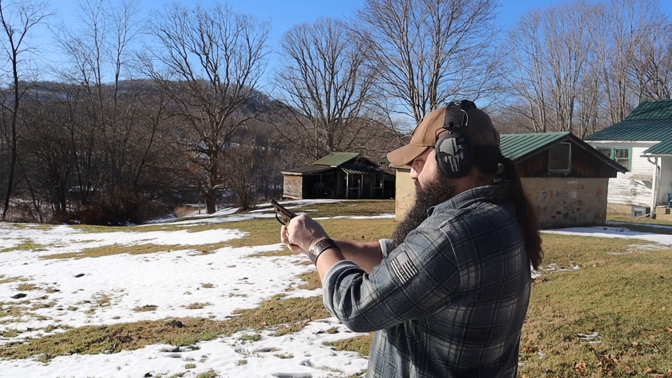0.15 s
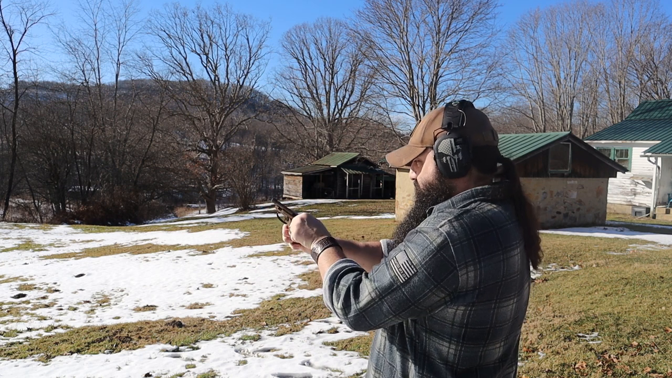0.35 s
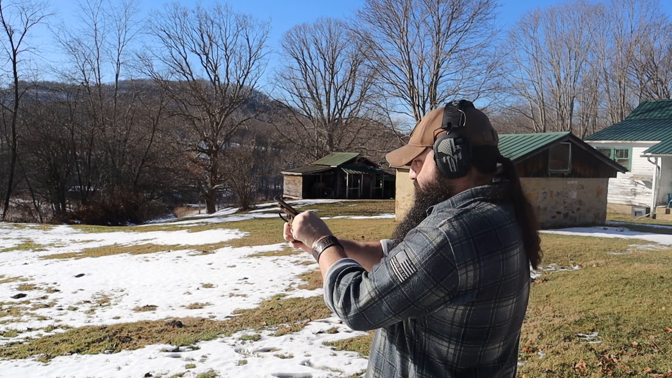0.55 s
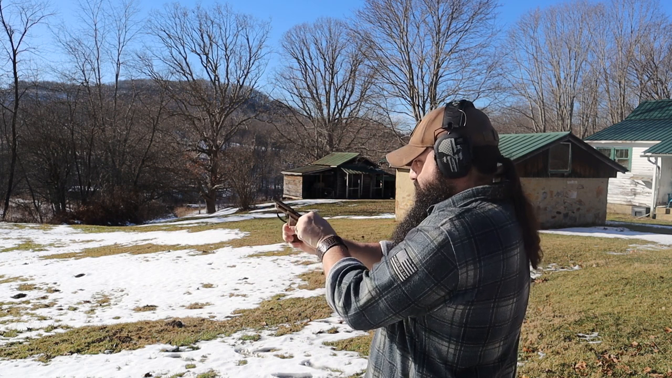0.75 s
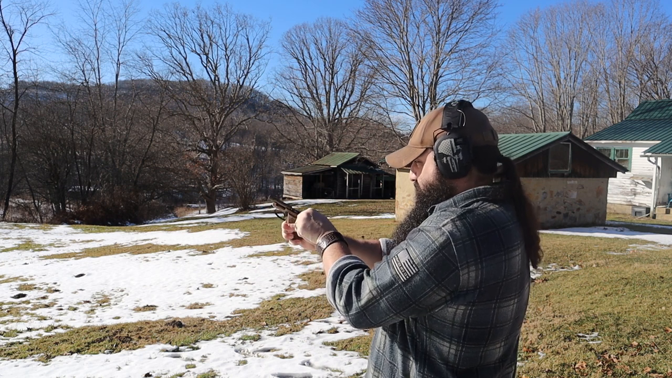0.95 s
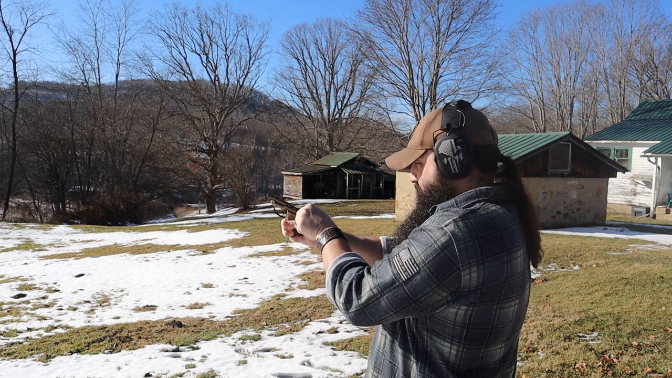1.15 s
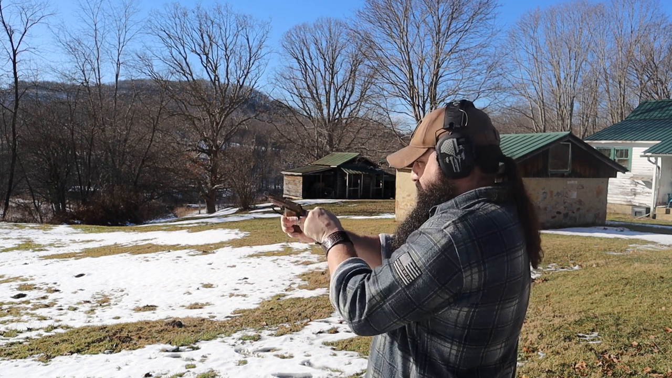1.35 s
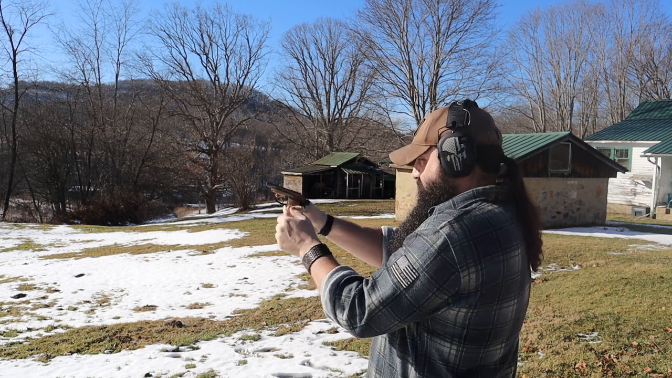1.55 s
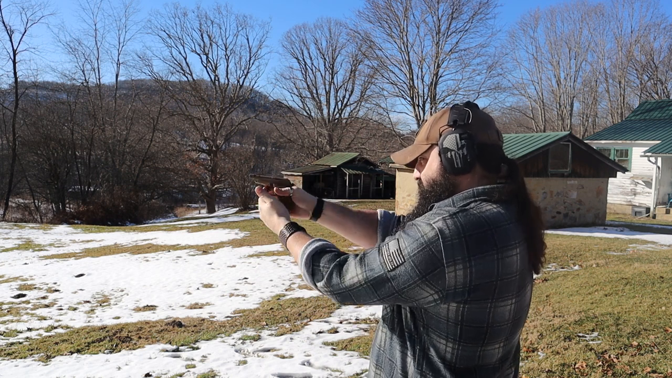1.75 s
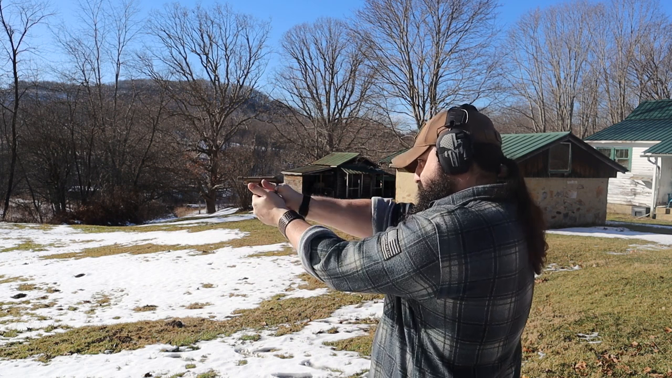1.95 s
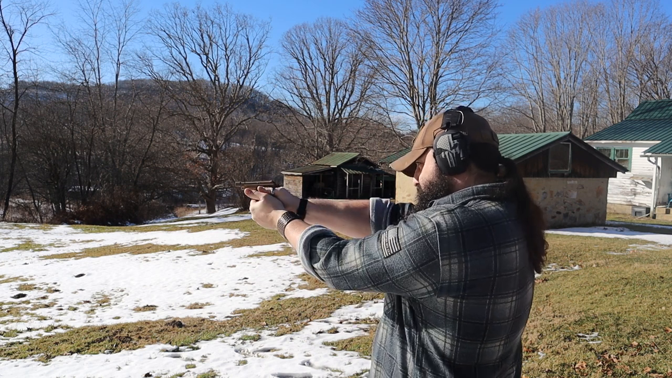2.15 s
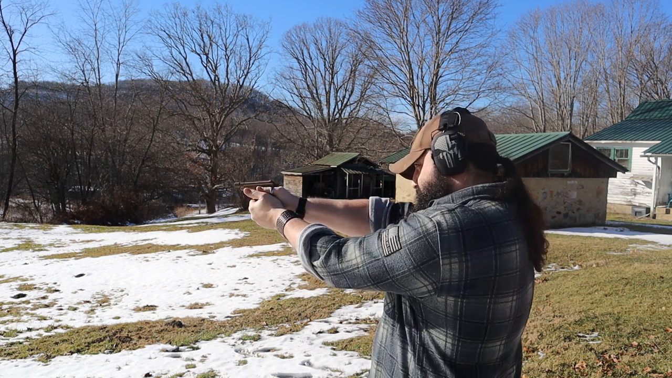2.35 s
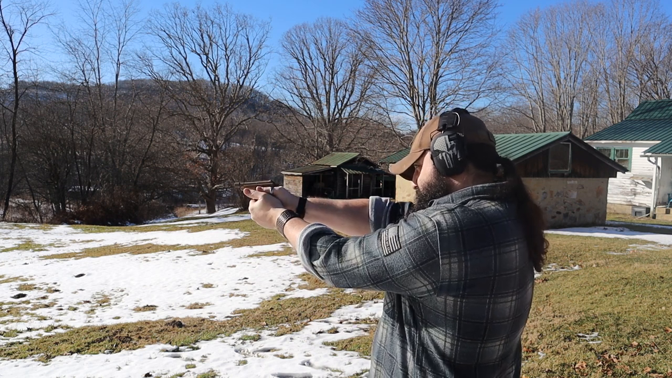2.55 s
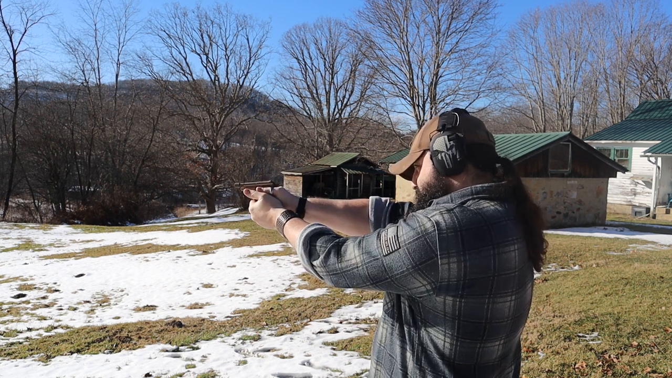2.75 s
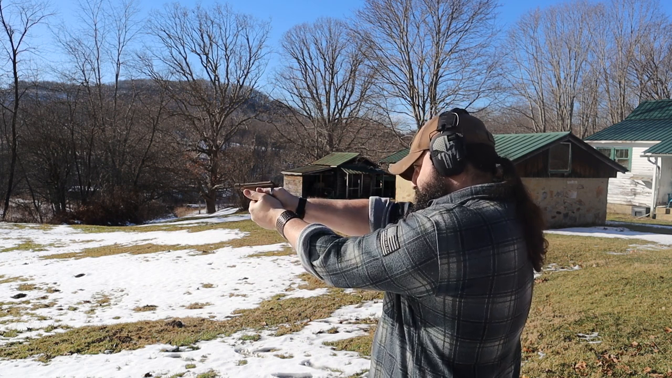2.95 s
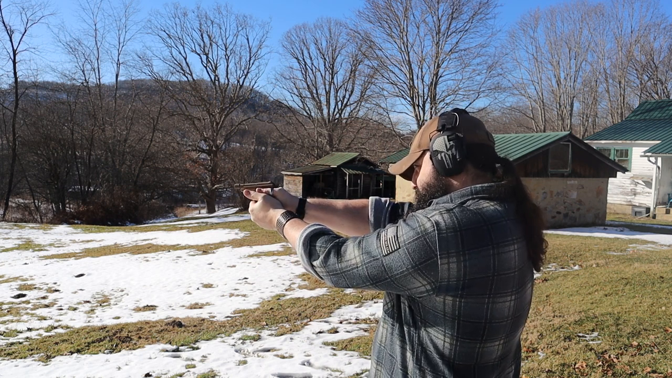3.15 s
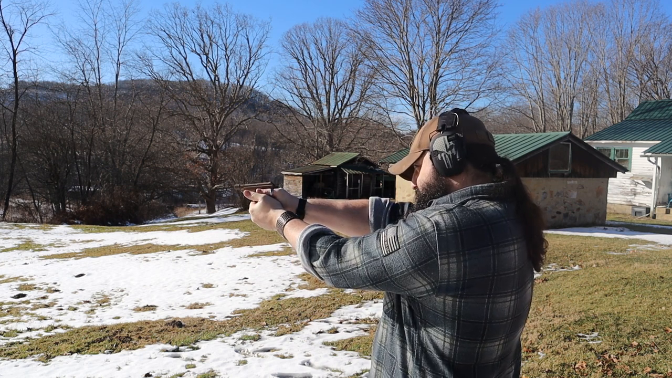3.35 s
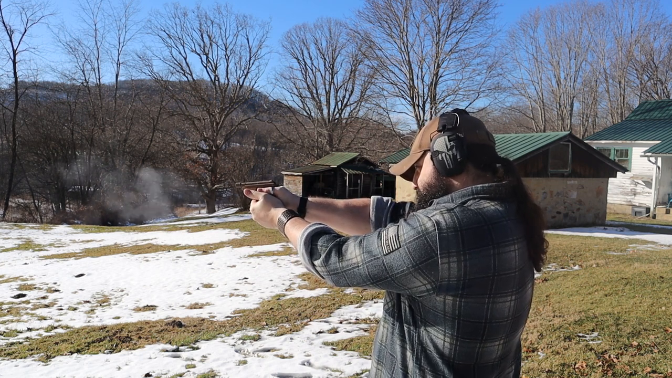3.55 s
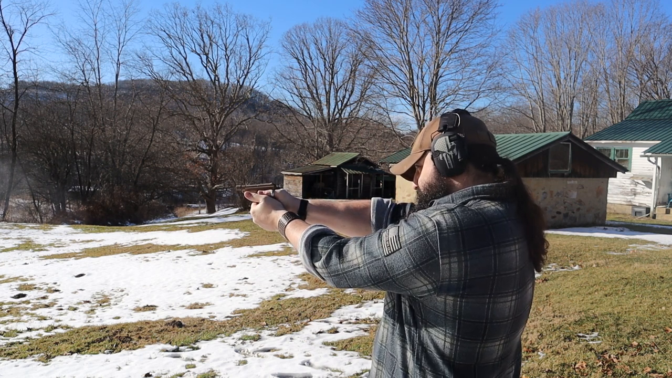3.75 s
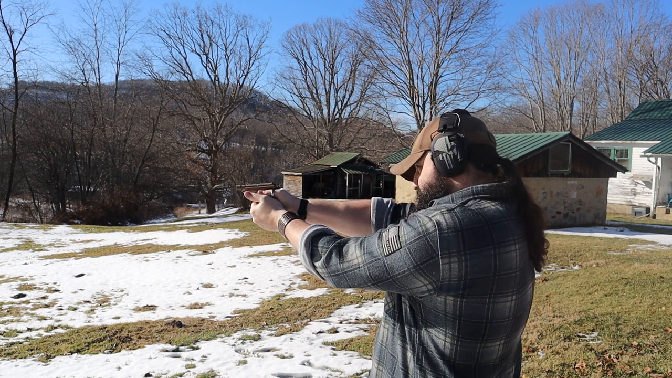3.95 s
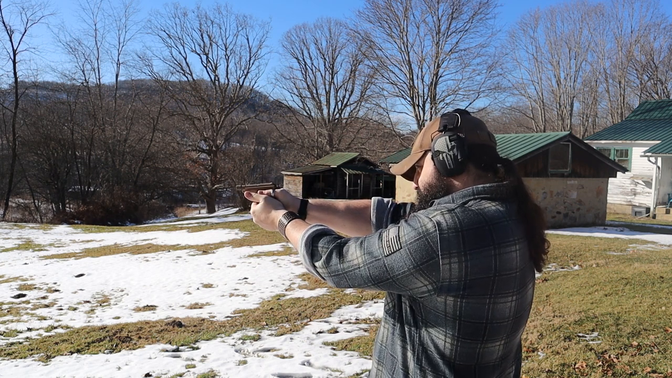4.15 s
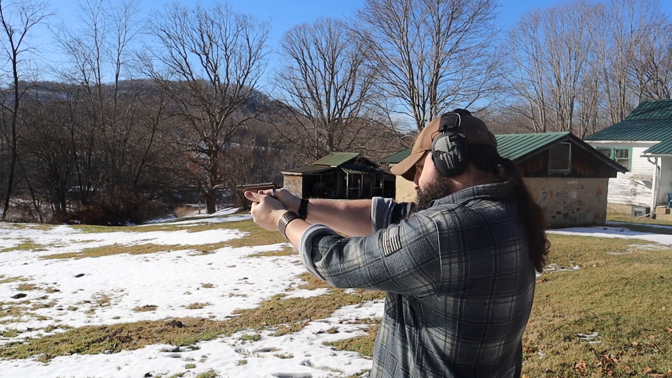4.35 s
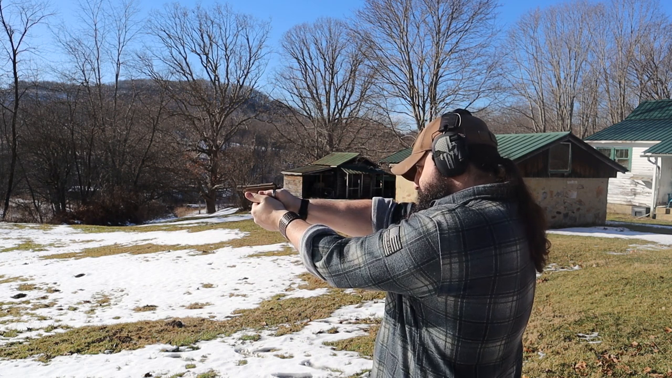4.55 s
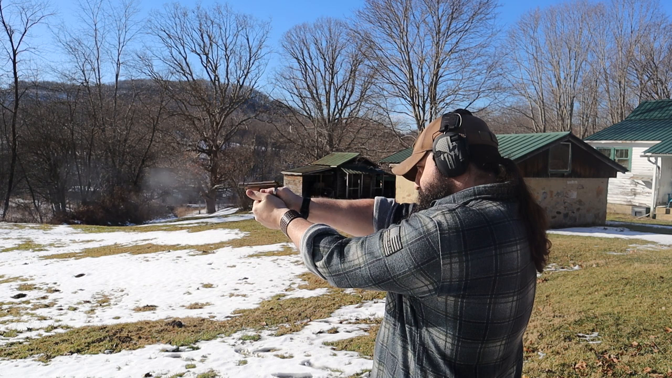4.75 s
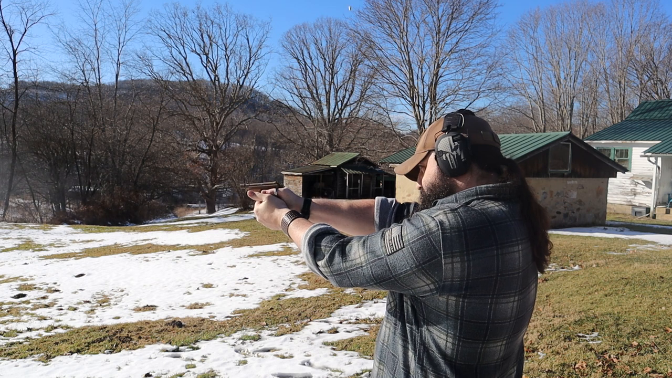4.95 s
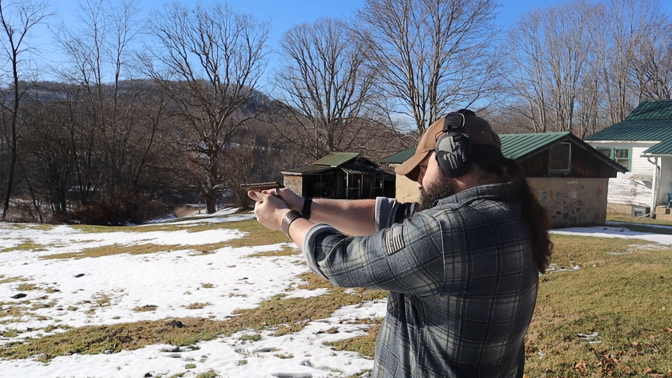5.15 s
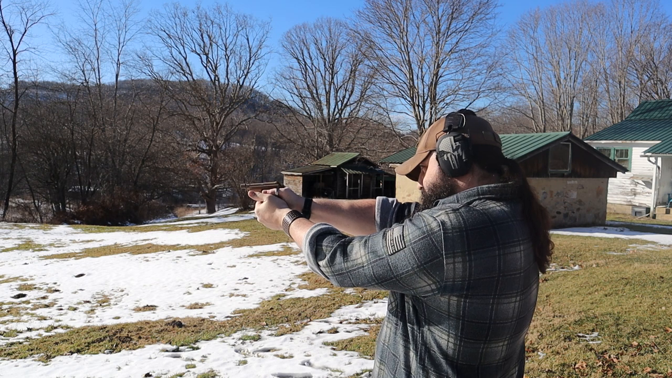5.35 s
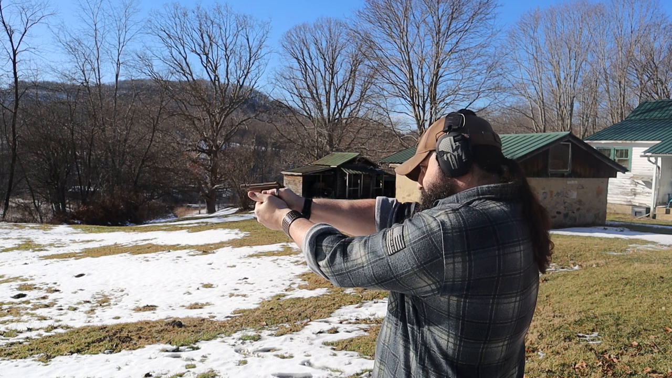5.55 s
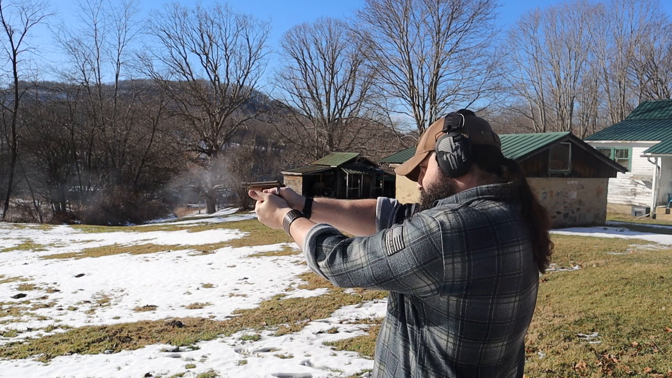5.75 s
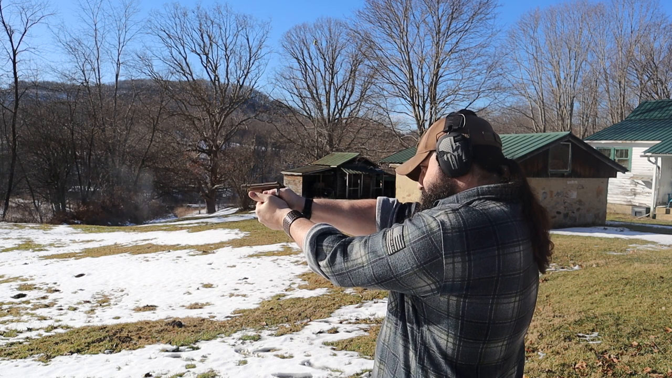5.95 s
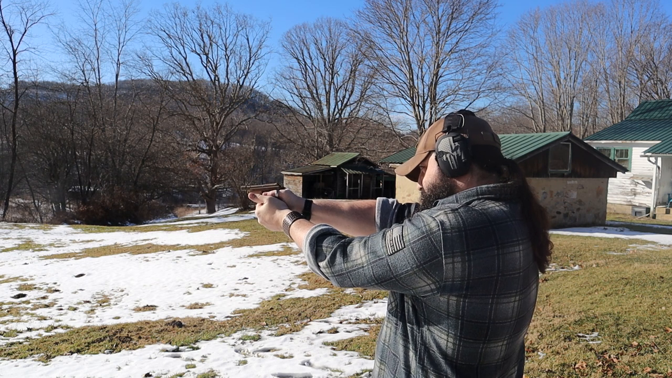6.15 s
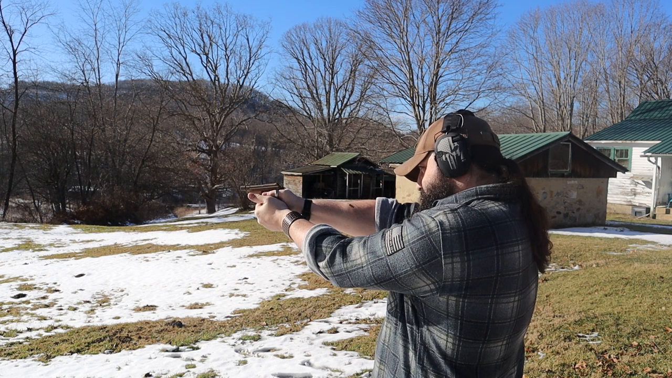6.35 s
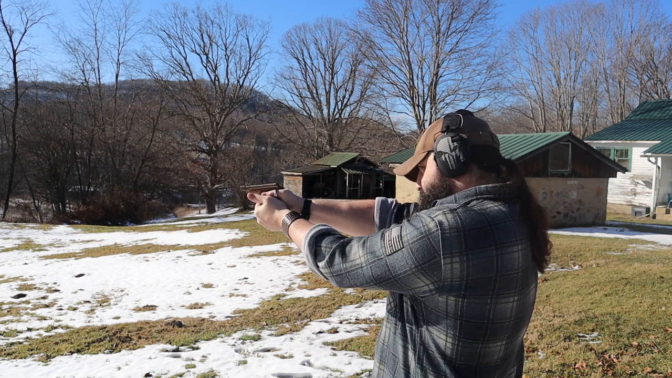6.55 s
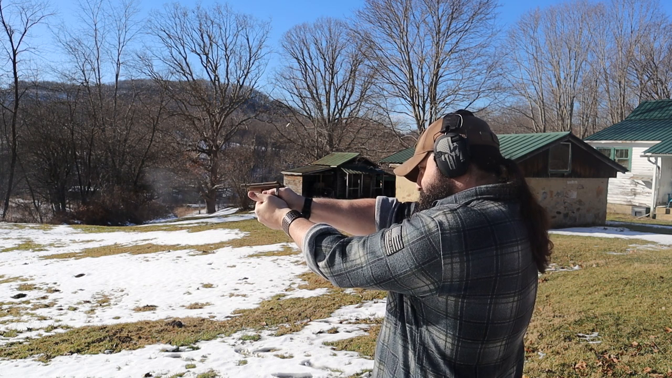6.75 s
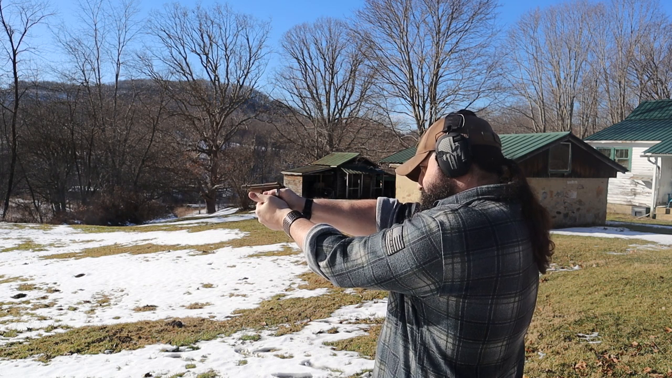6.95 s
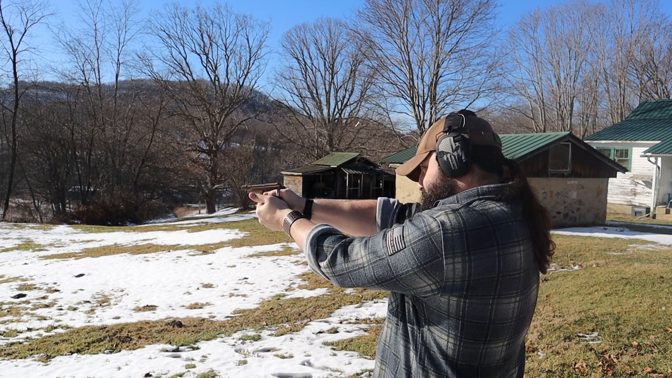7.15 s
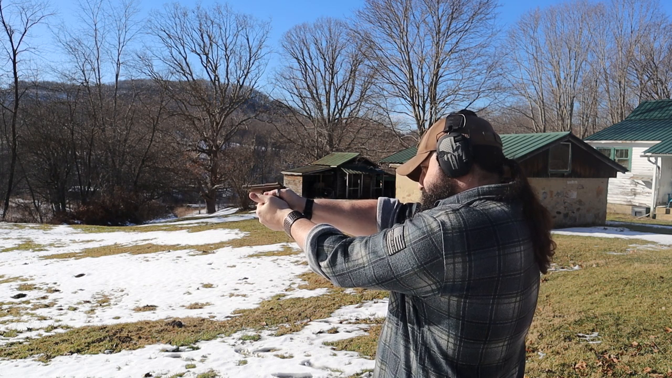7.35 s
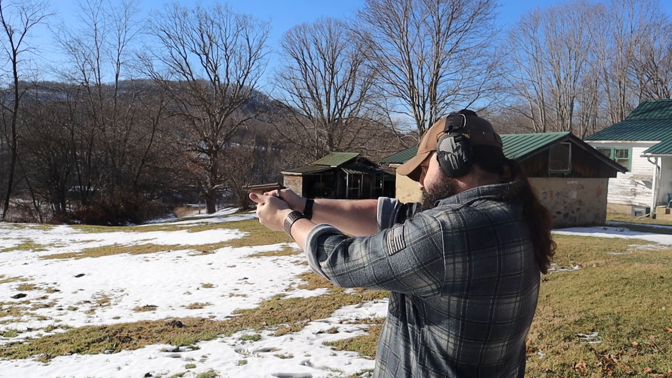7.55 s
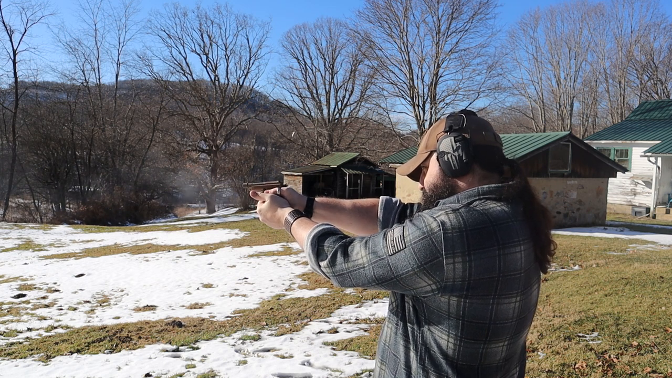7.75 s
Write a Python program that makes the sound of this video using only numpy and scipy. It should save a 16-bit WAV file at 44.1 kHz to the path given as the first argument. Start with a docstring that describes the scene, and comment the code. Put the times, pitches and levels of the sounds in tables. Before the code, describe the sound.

Close metallic clicks over faint wind, then four sharp, overloaded small-calibre gunshots about a second apart, each with quick slapback and a rolling valley echo.

```python
"""A small pistol, cocked with three steel clicks, fires four times in a snowy field close to the microphone.
Each shot is a pressure pulse with coloured noise bursts; it overloads the microphone and bounces off the ground.
Sheds slap it back as short wavelets; trees and hillside return a long noise wash that the air dulls.
Clicks, loose parts and a spring are noise and wavering rings. Wind, a far rush and still air are coloured noise."""
import sys
import numpy as np
from scipy import signal
from scipy.fft import rfft, irfft, next_fast_len
from scipy.io import wavfile

SR = 44100
rng = np.random.default_rng(int(sys.argv[2]) if len(sys.argv) > 2 else 0)


def wrap_up_sound(samples):
    """Save the sound to the file named by the first command line argument, as 16-bit audio."""
    columns = np.atleast_2d(samples).T
    # keep every value between -1 and 1, then stretch to whole-number steps
    tamed = np.clip(columns, -1, 1)
    steps = np.round(tamed * 32767).astype(np.int16)
    wavfile.write(sys.argv[1], SR, steps)


N = 344421  # length in samples
TIME = np.arange(N) / SR

# Slow level of the distant rush, before a 3 dB lift and a random waver: [t/s, level/dB]
RUSH_LEVEL = [(0.0, -50.5), (0.5, -56.5), (1.0, -49), (1.29, -51.5), (1.44, -55.5), (1.7, -59.5),
              (2.13, -55.5), (3.45, -62)]
# Gusts on the microphone: [t/s, level/dB, rise/s, decay/s]
GUSTS = [(.3, -54, .6, 0.45), (1.31, -46, .04, 0.034), (2.5, -39.5, 0.59, 0.14), (2.88, -38, 0.054, .07),
         (3.33, -44, 0.12, 0.064)]
# Tone colours of the distant rush, the gusts and the still air: [f/Hz, relative level/dB]
RUSH_COLOUR = [(150, -41), (350, -4), (560, 6), (900, -1.5), (1300, -5), (2200, -27.5), (4000, -27)]
GUST_COLOUR = [(15, -33), (40, 5.5), (90, -5.5), (160, -12), (300, -28.5), (800, -49.5)]
STILL_AIR_COLOUR = [(12, -36), (20, 5.5), (81, -8.5), (293, -9), (446, -12.5), (527, -32), (802, -38),
                    (1090, -16.5), (1910, -20), (14700, -30.5), (16000, -34)]
# Tone colours of the wash from the near trunks and from the slope behind: [f/Hz, relative level/dB]
WOODS_COLOUR = [(60, -48), (220, -21.5), (350, -19), (500, -7.5), (750, -14.5), (1100, -4), (1600, -1),
                (2100, -6.5), (2900, -10), (5000, -13), (8000, -17), (15000, -21)]
HILL_COLOUR = [(60, -31), (220, -28), (350, -16), (500, -8), (700, -3), (1000, -0.5), (1400, -1),
               (2000, -7), (2900, -12.5), (5000, -15.5), (8000, -24), (15000, -27.5)]
# Belts of reflectors, near to far: rough field and brush, bushes by the sheds, tree line, hillside,
# far side of the valley: [delay/s, level/dB, build-up/(dB/s), depth/s, fade/(dB/s)]
BELTS = [(.085, -38, 200, 0.061, 100), (0.162, -26.5, 500, 0.006, 500), (0.289, -19.5, 114, .14, 179),
         (.54, -29, 75, .1, 50), (.85, -36.5, 15, 0.72, 14)]
# Echoes from walls and trunks, levels before a shared 2 dB lift:
# [delay/s, level/dB, centre f/Hz, left minus right/dB, scatter time/s]
ECHOES = [(0.1183, 5, 1440, -17, 0.0043), (0.126, -4, 1500, -5, 0.0025), (.131, -11.5, 1590, -7, 0.0026),
          (.1666, -7, 1500, 7, .002), (.1822, -8.5, 2050, 10, .0008), (.2066, -8.5, 1300, 14, .0008),
          (.2430, -7, 1490, 3.5, 0.0047), (.3280, -3, 1340, 33, 0.0024), (.3321, -6.5, 1460, -28, .0061),
          (.6170, -12, 690, 5.5, 0.01), (.621, -20, 1060, 10, 0.0047), (.6630, -17, 810, 16, 0.012)]
# Tone colours of the steel parts and the spitting gas: [f/Hz, relative level/dB]
STEEL_COLOUR = [(180, -61), (300, -17), (801, -18), (1300, -7.5), (2100, -5), (2930, -4.5), (3700, 0),
                (4020, -4.5), (5900, 1), (8790, -9.5), (9710, -3.5), (14500, -14), (16000, -14)]
GAS_COLOUR = [(200, -5.5), (700, -3), (1500, 4.5), (2800, -4.5), (5500, -7.5), (8000, -10), (15000, -16)]
# Light ticks of loose parts, and the spring ringing on after the third click (1.469 s)
# and that click's echo from a building (1.5718 s): [t/s, level/dB, decay/s, ring f/Hz]
SMALL_SOUNDS = [(.0708, -46.5, 0.0062, 2930), (.197, -45, .005, 5100), (0.2196, -37, 0.0016, 3940),
                (1.469, -47.5, 0.08, 6500), (1.5718, -39.5, 0.0091, 6410), (1.6213, -45.5, .0017, 2800),
                (1.9564, -36, 0.0014, 2500), (2.14, -46, 0.0035, 3890), (2.153, -46, 0.0055, 4320),
                (6.6413, -46.5, 0.0028, 4800)]
# Steel parts scrape and snap home during cocking: [t/s, level/dB, rise/s, decay/s, frame ring level/dB]
CLICKS = [(.2454, -16, 0.00036, 0.00097, -16), (0.839, -26, 0.0019, 0.004, -39),
          (0.8441, -3.5, .00032, 0.00091, -5.5), (0.846, -12.5, 0.00019, 0.0051, -27),
          (1.4492, -11, 0.0035, 0.00086, -22), (1.453, -3.5, 0.00017, 0.0032, -24)]
# Shots: [t/s, relative level/dB]
SHOTS = [(3.5361, 3), (4.8164, 2.5), (5.8222, 2.24), (6.7922, 2.5)]

GROUND_DELAY_S = .00575  # how much later the ground bounce arrives
RESPONSE_SAMPLES = 3 * SR  # length of the landscape's answer


def amp(db):
    """Turn decibels into gain."""
    return 10 ** (np.asarray(db) / 20)


def add(track, start_s, sound):
    """Mix a sound into a stereo track at a given time."""
    i = max(int(round(start_s * SR)), 0)
    n = min(sound.shape[-1], track.shape[-1] - i)
    track[:, i:i + n] += sound[..., :n]


def pan(left_minus_right_db):
    """Left and right gains whose total power never changes."""
    gains = amp(np.array([[left_minus_right_db], [-left_minus_right_db]]) / 2)
    return gains / np.sqrt(np.mean(gains ** 2))


def walk(n, rate_hz):
    """Smooth chance: random values, rate_hz of them a second, joined by straight lines."""
    steps = np.arange(n) * rate_hz / SR
    return np.interp(steps, np.arange(1024), rng.standard_normal(1024))


def noise(n, width, grain_db=0):
    """Stereo noise; width is side over mid, grain_db spreads the sizes of single specks."""
    mid, side = rng.standard_normal((2, n)) * amp(-grain_db * rng.random((2, n)))
    return np.array([mid + width * side, mid - width * side])


def colour(sound, points):
    """Shape a noise's spectrum and bring its overall strength (rms) to one."""
    hz, db = np.transpose(points)
    n = sound.shape[-1]
    size = next_fast_len(n)
    f = np.maximum(np.fft.rfftfreq(size, 1 / SR), 1)
    gains = amp(np.interp(np.log(f), np.log(hz), db))
    shaped = irfft(rfft(sound, size) * gains, size)[..., :n]
    return shaped / shaped.std()


def swell(t, rise_s, decay_s):
    """Loudness curve that climbs to one at time zero and dies away."""
    return np.exp(np.minimum(t / rise_s, -t / decay_s))


def burst(spectrum, envelope, width=0.3):
    """A coloured noise burst that carries the energy of its envelope."""
    strength = np.sqrt(np.mean(envelope ** 2))
    return colour(noise(len(envelope), width) * envelope, spectrum) * strength


def from_left(sound):
    """The pistol is to the left, so the right side hears it two samples later."""
    return np.array([sound[0], np.roll(sound[1], 2)])


def wind(calm_db=-63, eddy_db=3.0):
    """Gusts push on the microphone; their powers add, and eddies make the level flutter."""
    power = amp(calm_db) ** 2
    for s, db, rise_s, decay_s in GUSTS:
        power = power + (amp(db) * swell(TIME - s, rise_s, decay_s)) ** 2
    eddies_db = eddy_db * walk(N, rate_hz=16)
    return colour(noise(N, 0.037), GUST_COLOUR) * np.sqrt(power) * amp(eddies_db)


def distant_rush(lift_db=3, waver_db=1.2):
    """A far rush: wide coloured noise that follows a slow level curve and wavers."""
    level_db = np.interp(TIME, *np.transpose(RUSH_LEVEL))
    chance_db = waver_db * walk(N, rate_hz=12)
    return colour(noise(N, 0.66), RUSH_COLOUR) * amp(lift_db + chance_db + level_db)


def still_air(level_db=-53):
    """The steady sound of still air: wide coloured noise at one level."""
    return colour(noise(N, 0.69), STILL_AIR_COLOUR) * amp(level_db)


def air(response, loss_db=3.5, power=1.38):
    """Air takes loss_db a second at 1 kHz, and more from the treble."""
    f, t, spectrum = signal.stft(response, SR, nperseg=256)
    khz = f[:, None] / 1000
    return signal.istft(spectrum * amp(-loss_db * khz ** power * t), SR)[1]


def belts(t):
    """Each belt of reflectors builds up, answers for as long as it is deep, and fades; powers add."""
    power = 0
    for delay_s, db, build, depth_s, fade in BELTS:
        before_s = np.maximum(delay_s - t, 0)
        after_s = np.maximum(t - delay_s - depth_s, 0)
        power = power + amp(db - build * before_s - fade * after_s) ** 2
    return np.sqrt(power)


def wash(clump_db=2.0, lean_db=2.24, woods_s=.11, hill_s=0.28):
    """Countless small reflections in clumps: bright from near trunks, then darker from the slope behind."""
    t = np.arange(RESPONSE_SAMPLES) / SR
    # the wash leans to one side, then the other
    sides_db = lean_db * walk(len(t), rate_hz=60) * np.array([[1], [-1]])
    specks = noise(len(t), width=.45, grain_db=70)
    clumps_db = clump_db * walk(len(t), rate_hz=120)
    hill = np.interp(t, [woods_s, hill_s], [0, 1])
    mix = (1 - hill) * colour(specks, WOODS_COLOUR) + hill * colour(specks, HILL_COLOUR)
    return mix * belts(t) * amp(sides_db + clumps_db)


def resonate(sound, hz):
    """Favour the pitches around hz with a broad two-pole band-pass."""
    return signal.lfilter(*signal.iirpeak(hz, 1, fs=SR), sound)


def high_pass(sound, hz, order):
    """Take away what lies below hz."""
    return signal.sosfilt(signal.butter(order, hz, "high", fs=SR, output="sos"), sound)


def slap(hz, scatter_s, cycles=0.62, crack_db=-10, scatter_db=-14, low_hz=500):
    """One echo: a sharp front and a short wavelet, trailed by scatter from edges and branches."""
    t = np.arange(SR // 20) / SR
    front = 1. * (t == 0)
    crack = amp(crack_db) * high_pass(front, 4000, order=2)
    turns = hz * t - 1  # the wavelet is strongest one cycle after the front
    wavelet = -np.cos(2 * np.pi * turns) * np.exp(-(turns / cycles) ** 2)
    scatter = resonate(resonate(noise(len(t), 1.0), hz), hz)
    scatter = amp(scatter_db) * scatter / scatter.std() * np.exp(-t / scatter_s)
    # long waves bend round small reflectors and do not come back
    return high_pass(crack + wavelet + scatter, low_hz, order=3)


def slaps(lift_db=2):
    """Distinct echoes from sheds and thick trunks, each from its own side."""
    response = np.zeros((2, RESPONSE_SAMPLES))
    for delay_s, db, hz, side_db, scatter_s in ECHOES:
        add(response, delay_s, amp(db + lift_db) * pan(side_db) * slap(hz, scatter_s))
    return response


def ring(t, hz):
    """Steel parts ring with an unsteady pitch."""
    waver = 1 + .04 * walk(len(t), rate_hz=700)
    return np.sin(2 * np.pi * hz * np.cumsum(waver) / SR)


def steel_parts(landscape, knock_s=0.00017, tail_db=-38, tail_s=0.028, ground_db=-11, echo_db=-61):
    """Steel parts scrape and snap home, knock and ring; ground and landscape answer faintly."""
    out = np.zeros((2, N))
    t = np.arange(-SR // 50, SR // 3) / SR
    frame_hz = 1328.5
    small_rise_s, small_ring_db = 0.00083, 1  # ring level relative to the small sound's own level
    clicks = [(s, db, rise_s, decay_s, frame_hz, ring_db) for s, db, rise_s, decay_s, ring_db in CLICKS]
    small = [(s, db, small_rise_s, decay_s, hz, db + small_ring_db) for s, db, decay_s, hz in SMALL_SOUNDS]
    for s, db, rise_s, decay_s, ring_hz, ring_db in clicks + small:
        envelope = swell(t, rise_s, decay_s) + amp(tail_db) * swell(t, rise_s, tail_s)
        snap = burst(STEEL_COLOUR, envelope)
        knock = ring(t, ring_hz) * swell(t - .0006, 0.00061, knock_s + decay_s)
        sound = from_left(amp(db) * snap + amp(ring_db) * knock)
        add(out, s + t[0], sound)
        add(out, s + t[0] + GROUND_DELAY_S, amp(ground_db) * sound)
    echoes = signal.fftconvolve(out, air(landscape), axes=1)[:, :N]
    return out + amp(echo_db) * echoes


def blast_wave(t, push_s, damping):
    """A shock front, a short push and a longer suction."""
    u = np.maximum(t, 0) / push_s
    return (t >= 0) * (1 - u) * np.exp(-damping * u)


def shot(t, hammer_db=-21, jet_db=0, gas_db=-3, splash_db=-5, scatter_db=-19):
    """The hammer falls, gas spits, the blast arrives and returns from the rough ground."""
    # the hammer and the first jet peak just before the blast at time zero
    hammer = amp(hammer_db) * burst(STEEL_COLOUR, swell(t + .0035, .0002, .004))
    jet = amp(jet_db) * burst(STEEL_COLOUR, swell(t + 0.00072, 0.00015, 0.0018))
    gas = amp(gas_db) * burst(GAS_COLOUR, swell(t - .001, 0.0016, 0.0005))
    late = t - GROUND_DELAY_S - .0006
    splash_envelope = amp(splash_db) * swell(late, 0.00061, 0.0011)
    scatter_envelope = amp(scatter_db) * swell(late, 0.00062, 0.011)
    splash = burst(GAS_COLOUR, splash_envelope + scatter_envelope)
    muzzle = 12.3 * blast_wave(t, push_s=.000356, damping=.63)
    ground = 1.2 * blast_wave(t - GROUND_DELAY_S, push_s=.004, damping=2.8)
    return from_left(muzzle + ground + hammer + jet + gas + splash)


def shots(landscape):
    """Every shot gets nearly the same answer; moving air changes a little of the wash."""
    out = np.zeros((2, N))
    t = np.arange(-SR // 100, SR // 10) / SR
    for s, db in SHOTS:
        add(out, s + t[0], amp(db) * shot(t))
        answer = air(landscape + .3 * wash())
        add(out, s, amp(db) * answer)
    return out


def scene():
    """Weather and pistol share one field; the pistol's sounds share one set of echoes."""
    landscape = slaps() + wash()
    weather = wind() + distant_rush() + still_air()
    return weather + steel_parts(landscape) + shots(landscape)


def record(dry):
    """The microphone saturates, its bass cut rebounds into a thump, and the converter clips."""
    ceiling, w, q = 1.16, 2 * np.pi * 49, .86  # bass cut at 49 Hz; w in radians per second
    saturated = ceiling * np.tanh(dry / ceiling)
    bass_cut = signal.bilinear([1, 0, 0], [1, w / q, w * w], SR)
    clipped = np.clip(signal.lfilter(*bass_cut, saturated), -1, 1)
    # a steep filter removes what lies above 16 kHz
    top_cut = signal.ellip(8, .2, 70, 16000, fs=SR, output="sos")
    return signal.sosfilt(top_cut, clipped)


dry = scene()
out = record(dry)
wrap_up_sound(out)
```